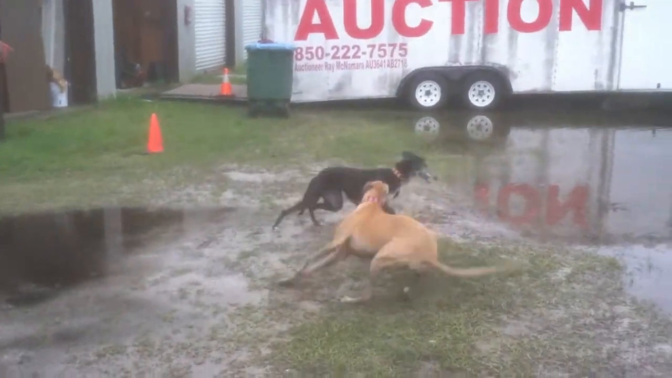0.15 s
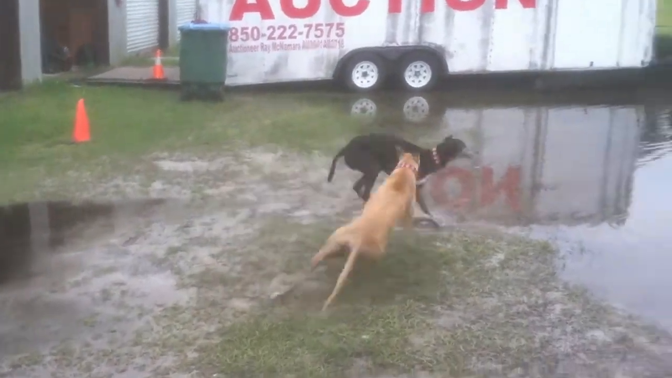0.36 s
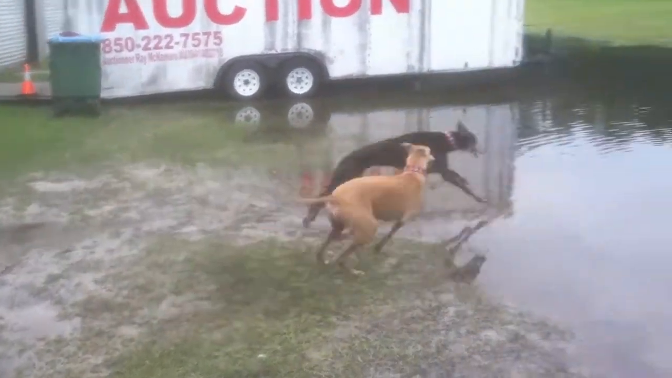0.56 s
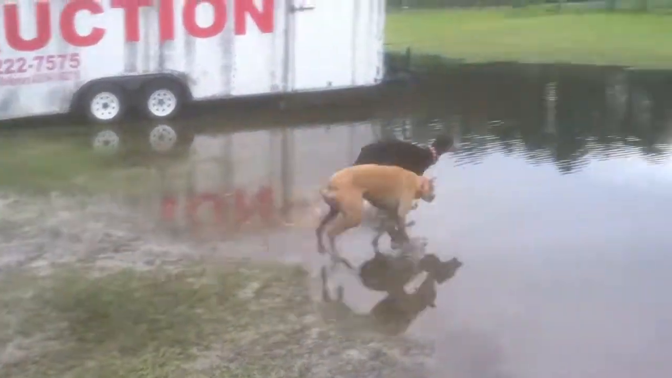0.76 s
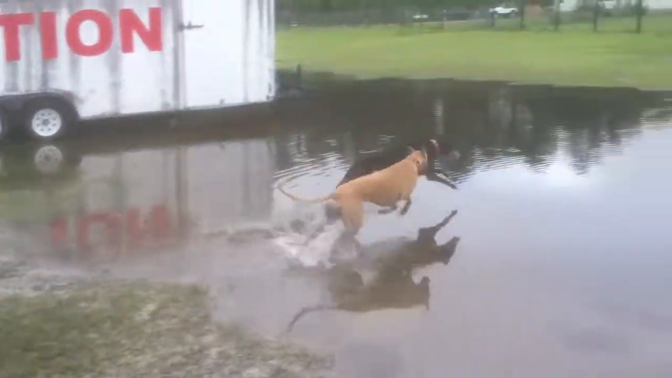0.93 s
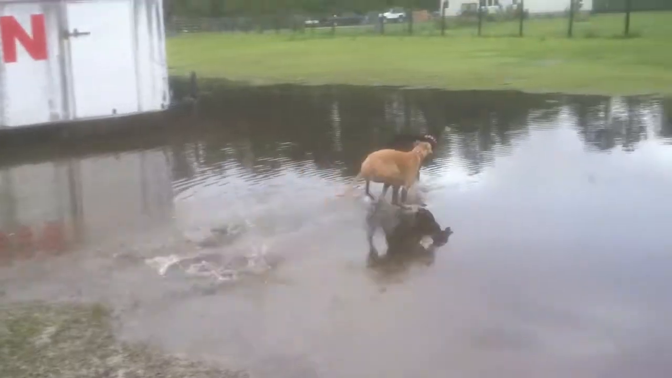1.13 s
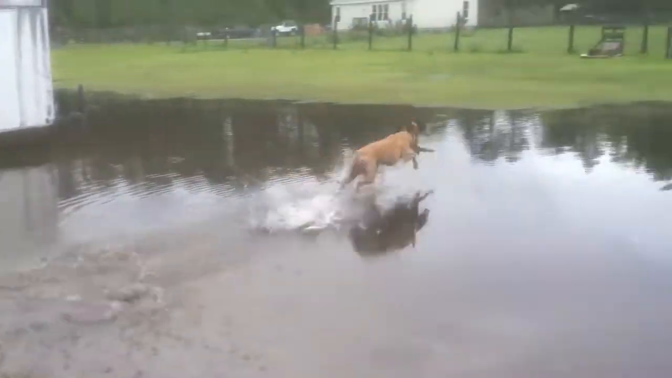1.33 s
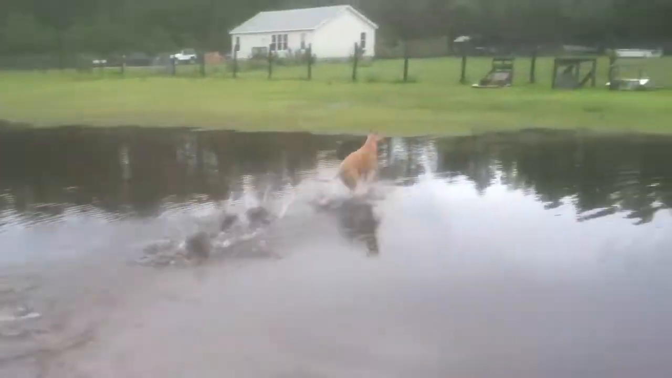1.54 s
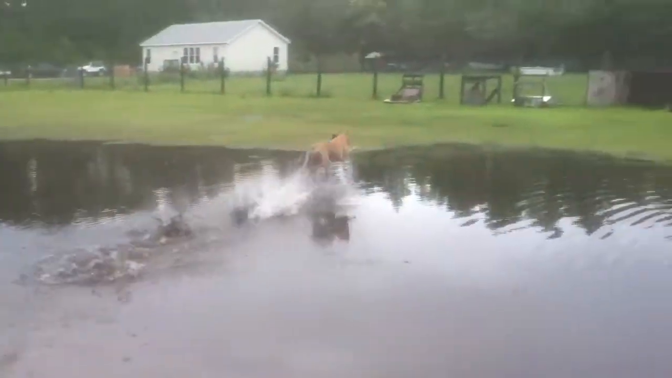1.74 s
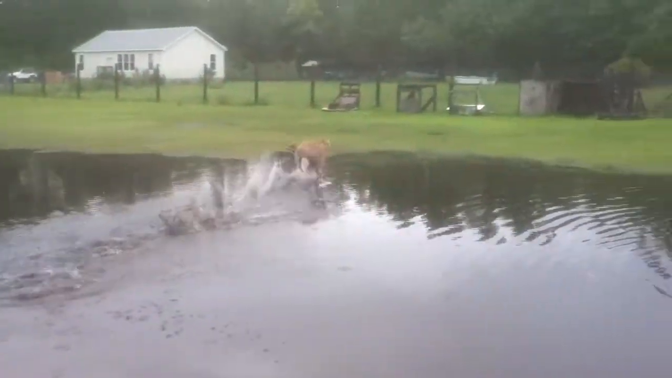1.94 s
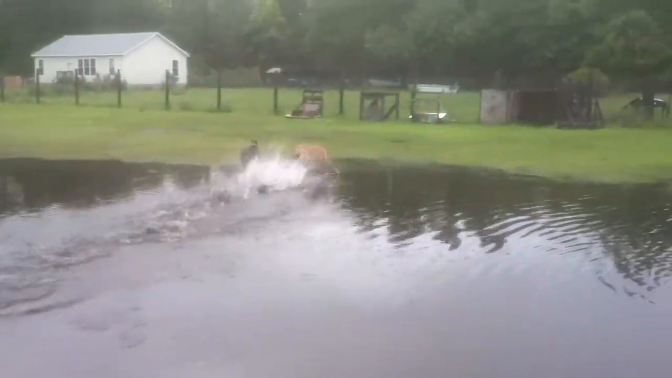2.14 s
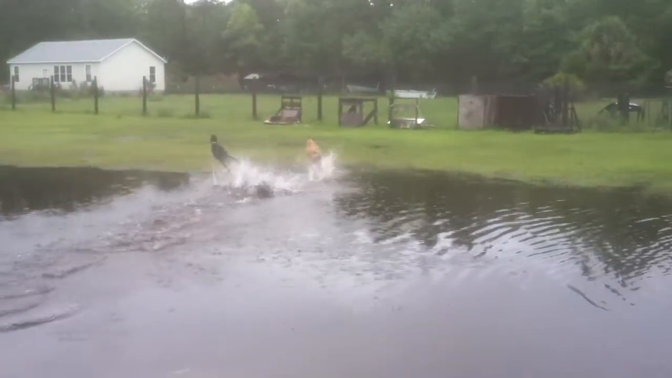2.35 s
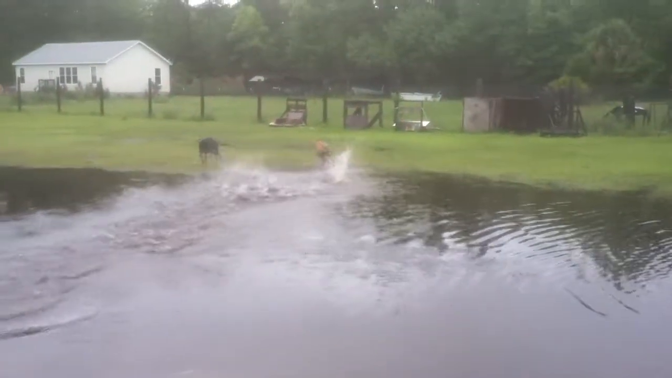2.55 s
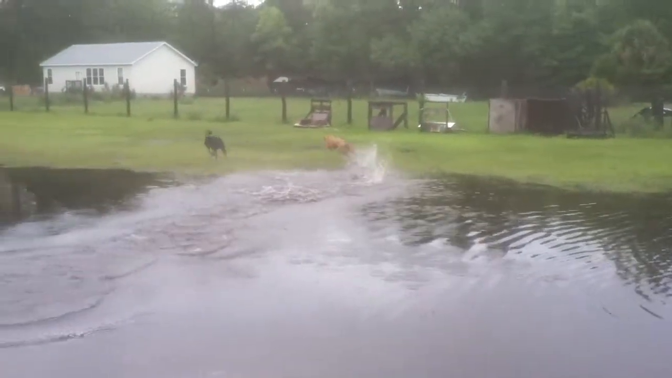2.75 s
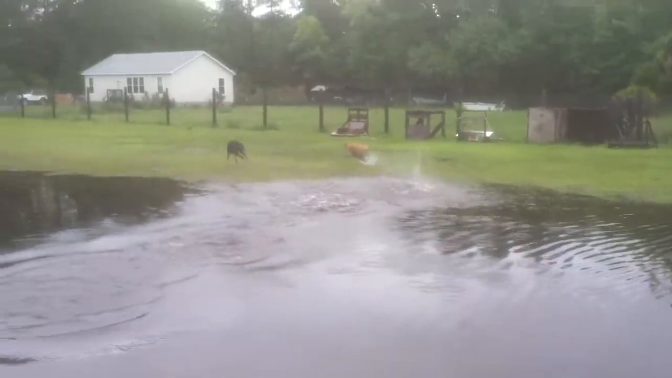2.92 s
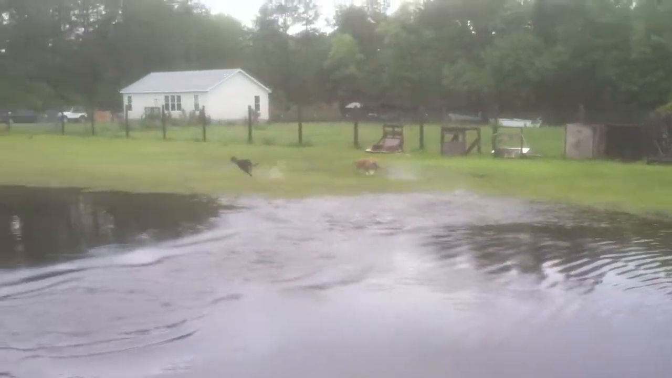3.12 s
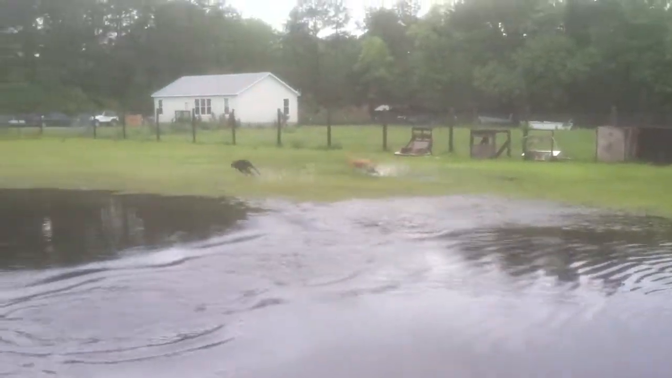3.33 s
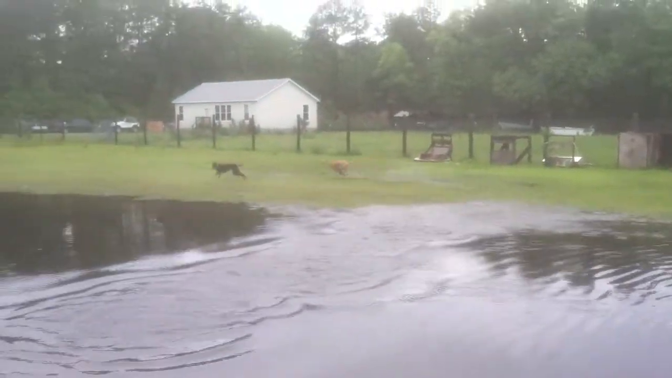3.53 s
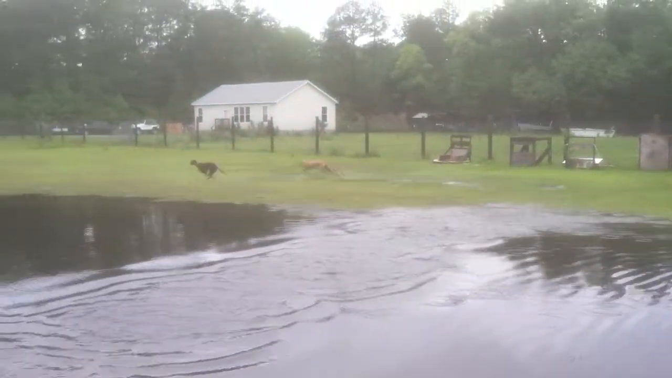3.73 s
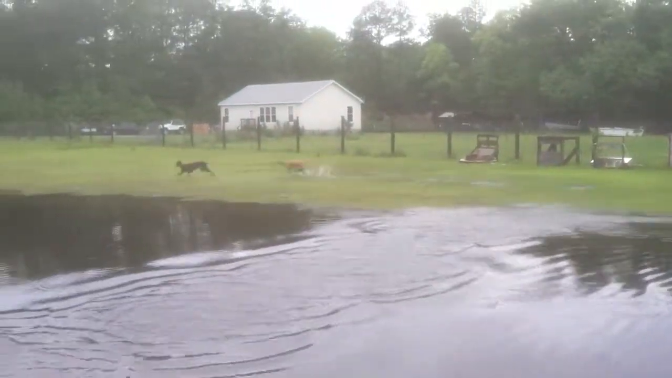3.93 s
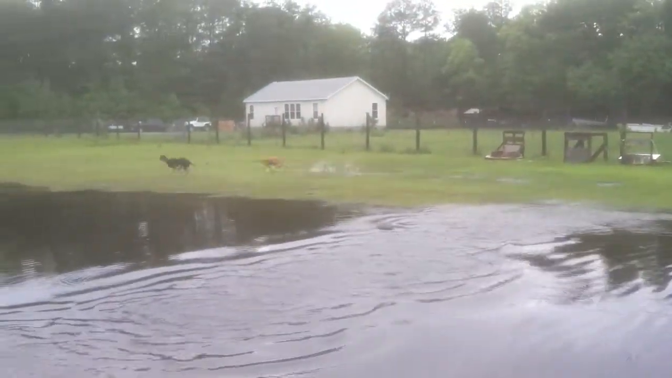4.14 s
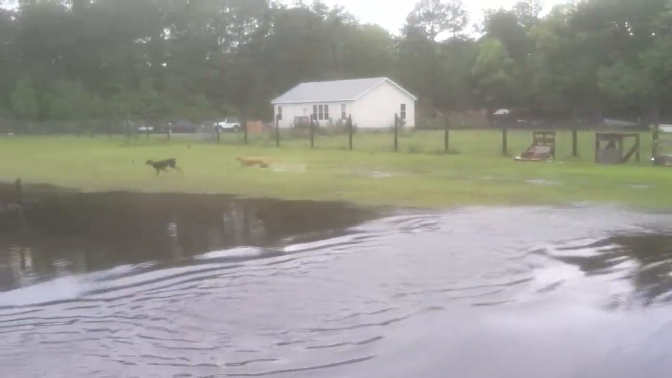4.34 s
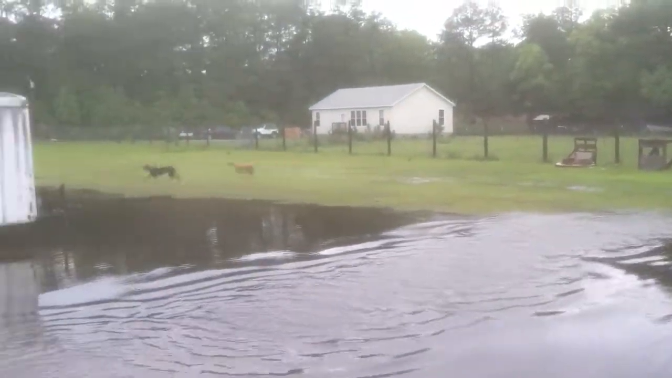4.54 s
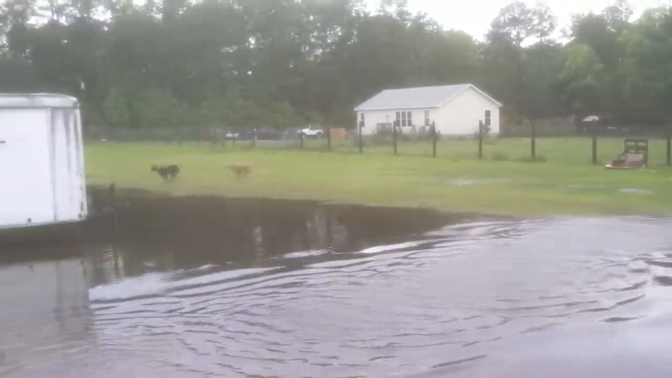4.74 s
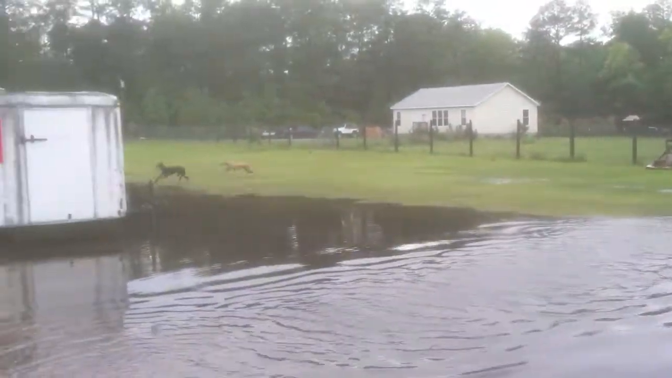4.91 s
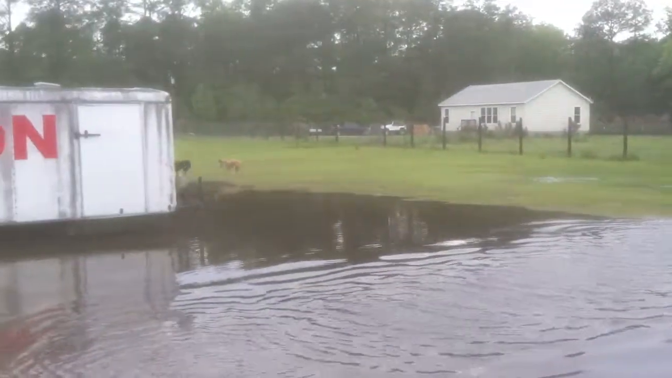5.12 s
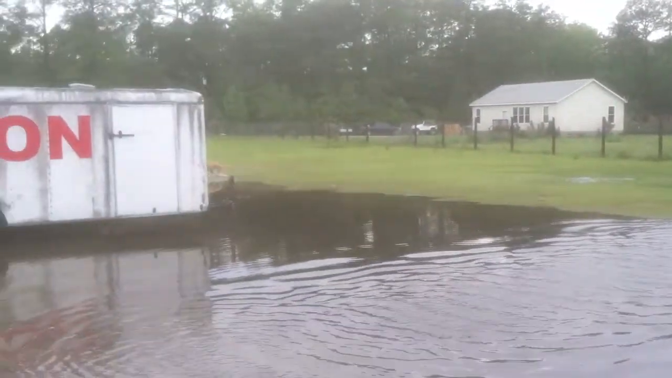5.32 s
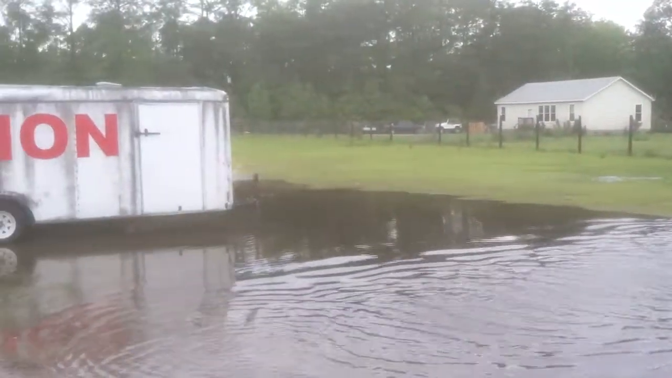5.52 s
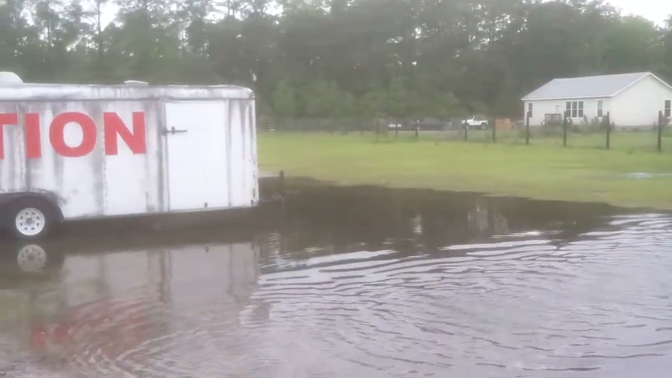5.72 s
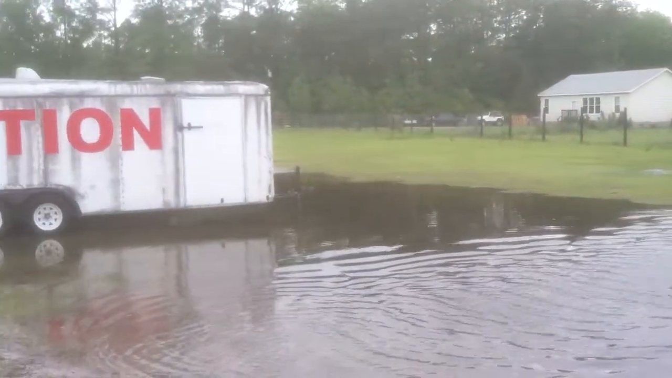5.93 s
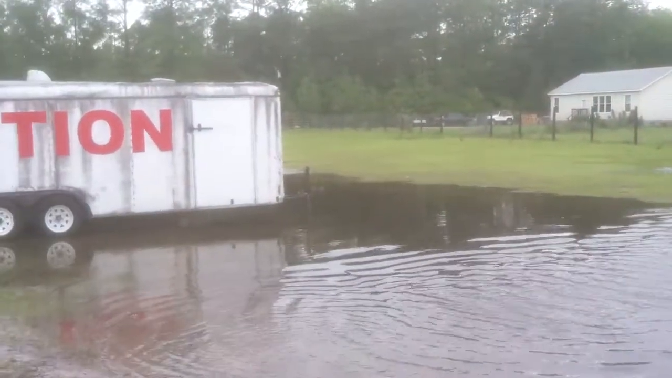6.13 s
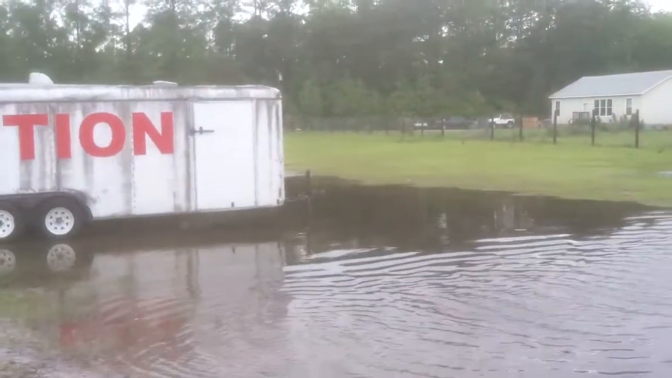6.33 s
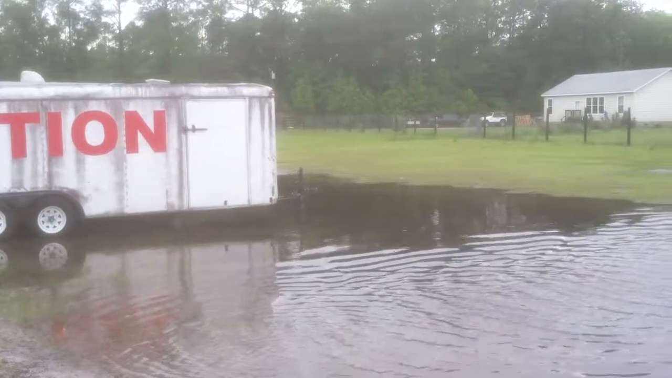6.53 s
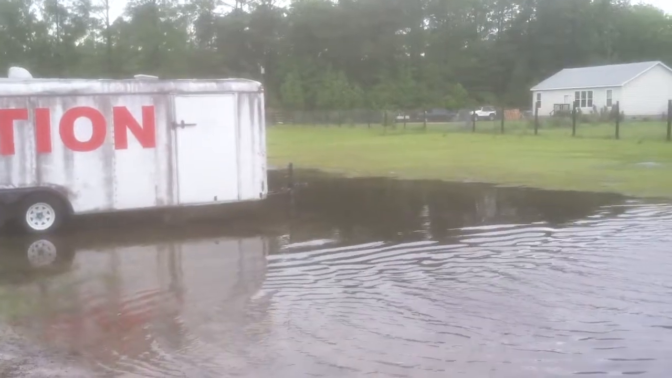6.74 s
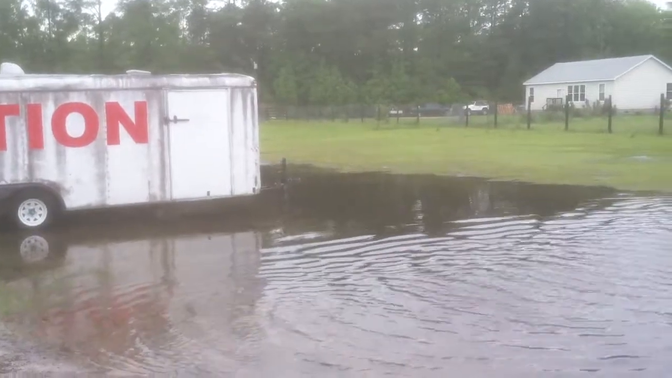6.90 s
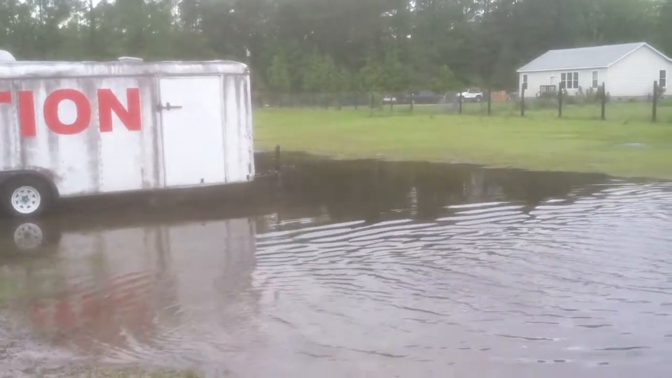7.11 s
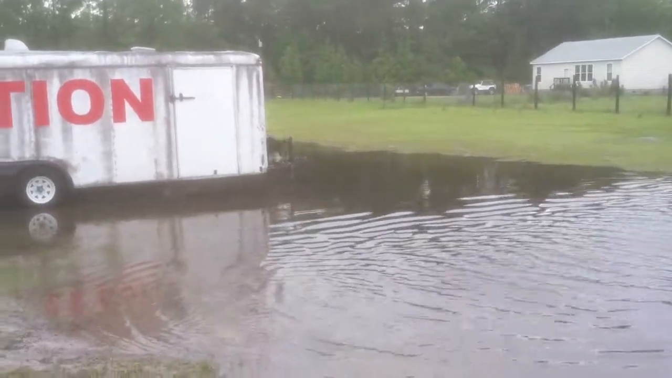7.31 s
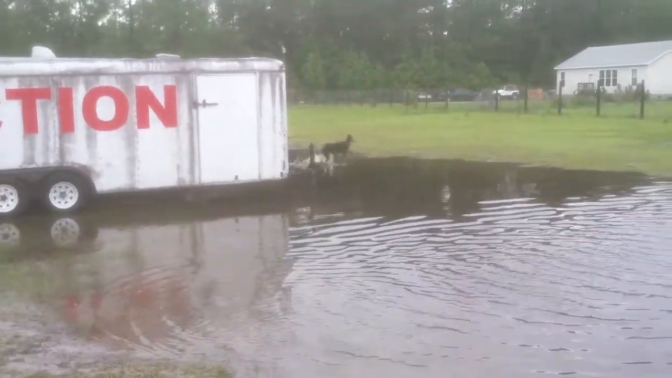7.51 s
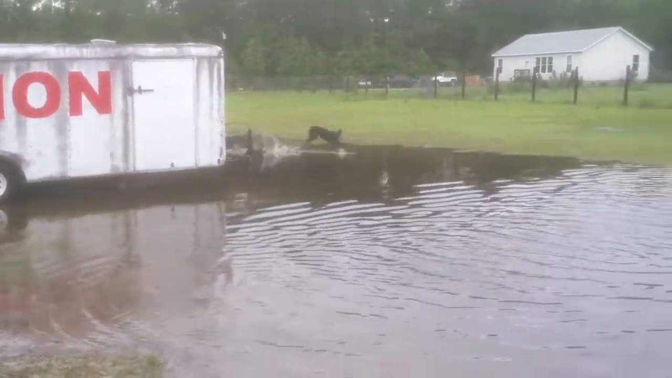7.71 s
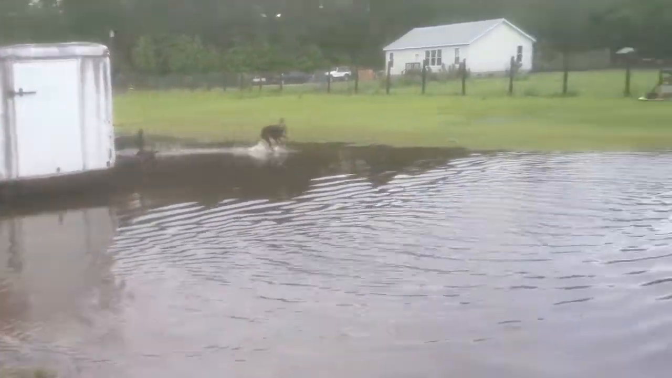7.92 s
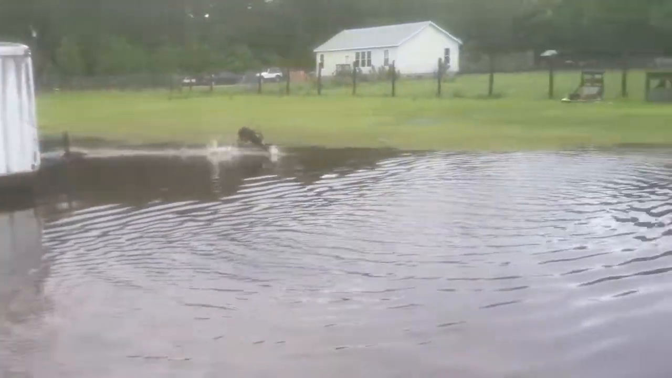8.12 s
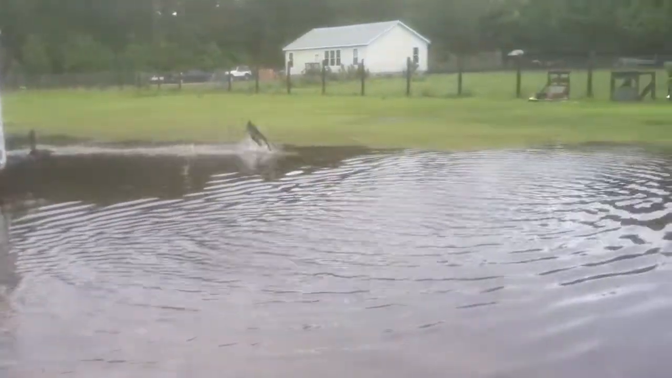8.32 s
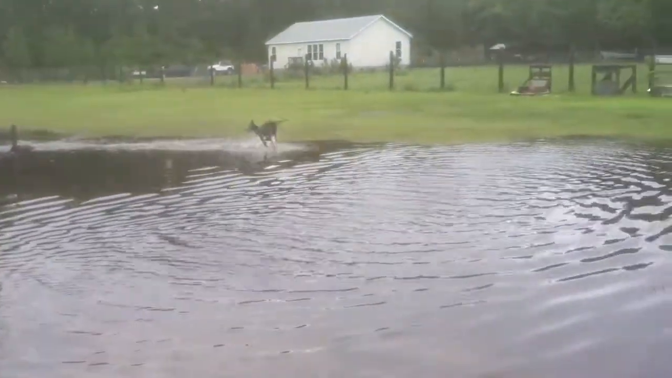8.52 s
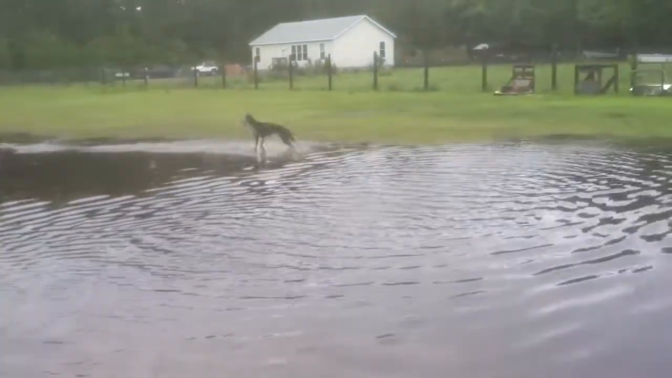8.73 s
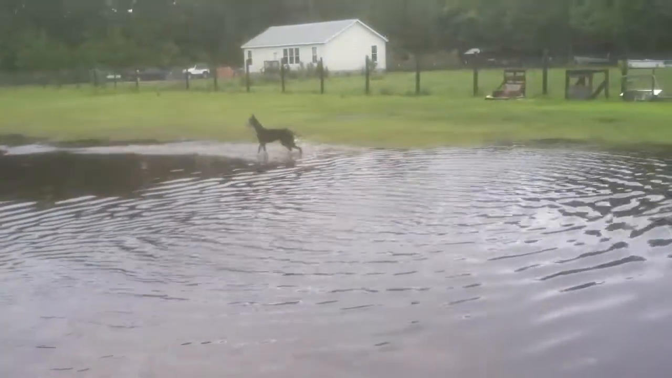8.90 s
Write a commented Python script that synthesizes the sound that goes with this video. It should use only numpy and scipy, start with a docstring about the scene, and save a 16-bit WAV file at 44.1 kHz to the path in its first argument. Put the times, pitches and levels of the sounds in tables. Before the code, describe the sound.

A handheld microphone in an open wet yard catches muddy scuffling and squelching, then rapid bubbly paw slaps and thrown water, loudest early and receding. Quiet follows, with soft air, a faint distant hum, lapping drops and a muffled patter of water around a trailer. After a thin bird whistle, crisp but distant splashes return and slow to loose trickling, with tiny tag clinks.

```python
"""Splashing paws: two dogs gallop through a wide shallow puddle after a scuffle on soaked turf; one splashes back.
Paw slaps are ringing air pockets with cracks and short drop bursts; gulps are low, decaying bubble tones.
Thrown water is bubbles and random impacts over a low rumble; levels follow a wake plus sheets and soft ticks.
Turf scuffs are bubbles with grit; squelches are noise through bending resonances; metal tags ring in modes.
A bird whistles faintly over filtered noise and a far hum; stray drips tick and weak echoes return."""
import sys
import numpy as np
from scipy import signal
from scipy.fft import rfft, irfft
from scipy.io import wavfile
from scipy.ndimage import uniform_filter1d

SR = 44100
rng = np.random.default_rng(int(sys.argv[2]) if len(sys.argv) > 2 else 0)


def store_pcm(level_fs):
    """Save levels as 16-bit WAV."""
    pcm = np.round(np.clip(level_fs, -1, 1) * 32767).astype(np.int16)
    wavfile.write(sys.argv[1], SR, np.atleast_2d(pcm).T)


N = 399555
TIME = np.arange(N) / SR


def amp(db):
    """Decibels to gain."""
    return 10 ** (np.asarray(db) / 20)


def evened(x):
    """Scales to an rms of one."""
    return x / np.sqrt(np.mean(x ** 2) + 1e-20)


def levelled(x, size=3500):
    """Holds the running rms near one over size samples; keeps the fine grain."""
    power = np.abs(uniform_filter1d(x ** 2, size))
    return x / np.sqrt(power + 1e-3 * np.mean(x ** 2))


def add(mix, s, sound):
    """Mixes a sound in at time s, cutting what falls outside."""
    start = round(s * SR)
    sound = sound[max(-start, 0):]
    part = mix[max(start, 0):][:len(sound) + min(start, 0)]
    part += sound[:len(part)]


def band(x, lo_hz, hi_hz, order=3):
    """Band-pass filter."""
    edges_hz = [lo_hz, min(hi_hz, SR / 2 - 1)]
    return signal.sosfilt(signal.butter(order, edges_hz, "band", fs=SR, output="sos"), x)


def colour(x, points, size=4096):
    """Minimum-phase filter of given spectrum and unit energy: clicks keep their sharp front."""
    hz, db = np.transpose(points)
    bin_hz = np.abs(np.fft.fftfreq(size, 1 / SR)) + 1
    log_gain = np.log(amp(np.interp(np.log(bin_hz), np.log(hz), db)))
    taps = np.fft.ifft(np.exp(np.conj(signal.hilbert(log_gain)))).real[:size // 2]
    return signal.oaconvolve(x, taps / np.linalg.norm(taps))[:len(x)]


def drift(rate_hz):
    """Smooth random curve of rms one; Gaussian roll-off at the given rate."""
    hz = np.fft.rfftfreq(N, 1 / SR)
    spectrum = rfft(rng.standard_normal(N)) * np.exp(-(hz / rate_hz) ** 2)
    return evened(irfft(spectrum, N))


def droplets(per_s, spread_db):
    """Tiny impacts at random moments, with random sign and size."""
    size = amp(spread_db * np.minimum(rng.exponential(1, N), 4))
    hits = rng.random(N) < per_s / SR
    return evened(size * rng.choice([-1, 1], N) * hits)


def ring(t, hz, cycles, rise):
    """A bubble: a sine that dies within some cycles and rises in pitch as it nears the surface."""
    age = t * hz / cycles
    return np.exp(-age) * np.sin(2 * np.pi * hz * t * (1 + rise * age))


def bubbles(lo_hz, hi_hz, cycles, spread_db, count, size):
    """A cloud of bubbles, each with its own moment, pitch, damping and strength."""
    when, pitch, damping, strength, sign = rng.random((count, 5)).T[:, :, None]
    hz = lo_hz * (hi_hz / lo_hz) ** pitch
    n = np.arange(size)
    gain = amp(-spread_db * np.log(strength + 0.056)) * np.sign(sign - .5) * hz
    own_cycles = cycles * 2 ** (2 * damping - 1)
    rings = gain * ring(n / SR, hz, own_cycles, rise=0.021) * (1 - n / size)
    places = (when * N).astype(int) + n
    return evened(np.bincount(places.ravel(), rings.ravel(), N + size)[:N])


def resonate(x, hz, width_hz):
    """A resonance that follows the curve hz: shift down to zero, smooth, shift back."""
    turn = np.exp(2j * np.pi * np.cumsum(hz) / SR)
    r = np.exp(-np.pi * width_hz / SR)
    return (turn * signal.lfilter([1 - r], [1, -r], x / turn)).real


# hollow squelches and gruff huffs of the wrestling:
# (time [s], length [s], start pitch [Hz], end pitch [Hz], level [dB])
SQUELCH_EVENTS = [(-.01, 0.045, 840, 740, -45), (0.09, 0.034, 1400, 1450, -44),
                  (0.11, 0.12, 296, 189, -46.5), (0.142, 0.2, 1410, 1510, -49.5),
                  (0.216, 0.056, 270, 196, -43.5), (0.22, 0.095, 1000, 1070, -46),
                  (0.383, 0.018, 1100, 1070, -40.5), (0.472, 0.067, 334, 403, -45),
                  (.565, 0.089, 1110, 1240, -44.5), (0.566, .06, 1390, 1540, -46.5),
                  (0.628, 0.11, 408, 323, -39.5), (0.641, 0.077, 1290, 1240, -38.5),
                  (0.765, 0.051, 1310, 950, -40.5), (0.889, 0.05, 736, 800, -43)]


def squelches():
    """Air and water squeeze through a hollow that changes size, so its pitch bends."""
    out = np.zeros(N)
    rushes = rng.standard_normal((len(SQUELCH_EVENTS), SR))
    for (s, length, start_hz, end_hz, db), rush in zip(SQUELCH_EVENTS, rushes):
        hz = np.linspace(start_hz, end_hz, int(length * SR))
        hollow = resonate(rush[:len(hz)], hz, width_hz=140)
        hollow = resonate(hollow, hz, width_hz=190)
        add(out, s, amp(db) * levelled(hollow, size=600) * signal.windows.tukey(len(hz), .5))
    return out


# paws skidding on soaked turf: (time [s], length [s], level [dB], grit setting [dB])
SCUFF_EVENTS = [(-.005, 0.022, -38, 10), (0.024, 0.14, -43, 4), (0.16, 0.031, -48, 8),
                (0.212, .11, -44, 6.5), (0.327, 0.053, -61, 12), (0.382, 0.044, -37.5, -15),
                (0.426, 0.026, -48, 12), (0.468, 0.046, -39, 6), (0.571, 0.16, -41.5, 5.5),
                (0.65, 0.073, -45, 10.5), (0.709, 0.064, -37.5, 12.5), (0.762, .014, -55, 16),
                (0.816, .08, -52, 12)]
# turf spectrum: (frequency [Hz], relative density [dB])
TURF_SPECTRUM = [(24, -58), (40, -29), (216, 1.5), (257, 2), (412, 2), (454, 3.5), (866, -1.5), (1290, -1),
                 (1780, -10), (2340, -8.5), (3470, -28), (4130, -23.5), (7490, -24.5), (10100, -35.5),
                 (15000, -58)]


def scuffs():
    """Paws drag through mud and grass: a dull squelch with wet grit on top."""
    squelch = bubbles(138, 2890, cycles=1.36, spread_db=0.5, count=7000, size=500)
    squelch = squelch + 2.0 * droplets(5000, spread_db=-4.5)
    squelch = levelled(colour(squelch, TURF_SPECTRUM), size=1500)
    grit = evened(band(colour(droplets(2500, spread_db=-1.5), TURF_SPECTRUM), 1660, 12000))
    out = np.zeros(N)
    for s, length, db, grit_db in SCUFF_EVENTS:
        corners_s = [s, s + 0.0089, s + 0.81 * length, s + length + 0.0085]
        stroke = np.interp(TIME, corners_s, [0.041, 0.71, 0.71, 0.00088])
        out += amp(db) * stroke * (squelch + amp(grit_db - 13.5) * grit)
    return out


# distant hum that swells and fades: (time [s], level [dB])
HUM_LEVEL = [(0, -95), (2.9, -65.5), (4.3, -64), (4.9, -77.5), (9.06, -78)]
# air spectrum: (frequency [Hz], relative density [dB])
AIR_SPECTRUM = [(15, -41), (25, -12), (49, -27.5), (116, -2), (209, -1), (421, -15.5), (781, -12.5),
                (894, -23), (1230, -18.5), (1800, -18), (2110, -10.5), (3430, -19.5), (7680, -26.5),
                (14300, -42.5), (15500, -51)]
HUM_HZ, AIR_DB = 207.7, -63.5  # both centres of slight drift


def outdoors():
    """Soft filtered-noise air with a low, slightly unsteady hum."""
    noise = evened(colour(rng.standard_normal(N), AIR_SPECTRUM))
    air = noise * amp(AIR_DB + drift(7.5))
    phase = 2 * np.pi * np.cumsum(HUM_HZ + drift(6)) / SR
    hum = evened(np.sin(phase) * (1 + .1 * drift(6)))
    return air + hum * amp(np.interp(TIME, *np.transpose(HUM_LEVEL)))


# splash spectrum, also for slaps and thrown water: (frequency [Hz], relative density [dB])
SPLASH_SPECTRUM = [(60, -35), (130, -15.5), (225, -4.5), (340, -15), (490, -2.5), (700, 1.5), (870, -8),
                   (1220, 3), (1620, -7), (1830, -13.5), (2280, -3.5), (3700, -29), (6700, -19),
                   (12500, -49)]


def drips():
    """Stray drops and lapping ripples: sparse filtered ticks throughout."""
    ticks = colour(droplets(60, spread_db=2), SPLASH_SPECTRUM)
    return amp(-74) * evened(band(ticks, 1900, 8000, order=2))


def yard(x):
    """Weak scattered echoes from a trailer, a shed and the trees: sparse decaying random taps."""
    t = np.arange(SR // 2) / SR
    sparse = (rng.random(len(t)) < .05) * (t > .012)
    taps = rng.standard_normal(len(t)) * sparse * amp(-60 * t / 0.88)
    return signal.oaconvolve(x, taps / np.linalg.norm(taps))[:N]


# tags knocking together:
# (time [s], level setting [dB], pitch the blow favours [Hz], ring time [share of free ring])
CLINK_EVENTS = [(0.1145, -27, 9900, 0.3), (0.1392, -34, 7220, .15), (0.192, -36.5, 7140, .15),
                (0.2814, -37, 7240, 0.17), (0.306, -40.5, 7600, .6), (1.2168, -20.5, 9500, 0.76),
                (1.261, -35, 6070, 1.3), (4.768, -45.5, 7500, 1.4), (4.857, -40, 9930, 1.8),
                (4.974, -46, 9800, 0.54), (5.2157, -34.5, 9900, 1.1), (5.244, -48, 7050, 0.7),
                (6.07, -60, 10000, 1), (6.679, -43, 7900, .6), (8.553, -44, 10000, .8),
                (8.59, -37, 9700, 0.42), (8.742, -37, 9800, 0.65), (8.762, -44, 9960, .8),
                (8.7883, -42.5, 9900, .8)]
# free modes of the tags: (frequency [Hz], level [dB], t60 [s])
TAG_MODES = [(6070, -3.5, .3), (7590, -3, .1), (9800, 0, .025), (10030, 0, .04)]
SWING_HZ = 17  # a dangling tag turns, so its ring throbs


def tags():
    """Small metal plates ring; where they are struck decides which mode leads, and fur may damp them."""
    t, out = np.arange(SR // 4) / SR, np.zeros(N)
    hz, mode_db, t60 = np.transpose(TAG_MODES)[:, :, None]
    turns = rng.random((len(CLINK_EVENTS), len(TAG_MODES), 1))
    throb = 1 - .6 * np.sin(np.pi * SWING_HZ * t) ** 2
    attack = 1 - np.exp(-t / 0.00031)
    for (s, db, lead_hz, free), turn in zip(CLINK_EVENTS, turns):
        weight = amp(mode_db - np.minimum(55 * np.abs(np.log(hz / lead_hz)), 13))
        decay = np.exp(-np.log(1000) * t / (t60 * max(free, .1)))
        modes = weight * decay * np.sin(2 * np.pi * (hz * t + turn)) * throb
        tick = 1.3 * band(rng.standard_normal(len(t)), 0.69 * lead_hz, 1.0 * lead_hz)
        tick = tick * np.exp(-t / 0.0049)
        clink = modes.sum(0) / np.linalg.norm(weight) + tick
        add(out, s + 0.00076, amp(db - 6.5) * clink * attack)
    return out


# thuds of paws and large air pockets closing:
# (time [s], level setting [dB], pitch [Hz], decay [cycles])
GULP_EVENTS = [(0.121, -28, 200, 0.66), (0.2, -34, 230, 1.4), (0.224, -27.5, 190, 1.3),
               (0.591, -30, 213, 5.5), (.66, -37, 388, 4.8), (.692, -30, 342, 2.7), (0.727, -30, 334, 4.6),
               (0.778, -34, 196, 3.3), (0.864, -25.5, 487, 1.6), (0.984, -24, 503, 2.2),
               (1.506, -32, 232, 2.7), (1.594, -39, 306, 1.4), (1.665, -24.5, 231, 3.2),
               (1.686, -26, 210, 2), (2.447, -42, 196, 1.4), (2.75, -39, 333, 1.3),
               (2.786, -33.5, 255, 0.77), (3.328, -34.5, 141, 0.73), (4.374, -28, 517, 1.6),
               (5.775, -37, 452, 3.5), (6.136, -41, 477, 2.7), (6.203, -40, 384, 1.8), (7.3, -42, 300, 1.9),
               (8.106, -39, 291, 3.4), (8.125, -41, 292, 2.2), (8.446, -31.5, 513, 2.3),
               (8.449, -37, 264, 0.74)]


def gulps():
    """Paws thud on the ground under the water; deep hollows behind the legs close with a low plop."""
    t, out = np.arange(SR // 6) / SR, np.zeros(N)
    for s, db, hz, cycles in GULP_EVENTS:
        swell = 1 - np.exp(-t * hz / (0.29 * cycles))
        add(out, s, amp(db - 2.5) * ring(t, hz, cycles, rise=0.0057) * swell)
    return band(out, 74, 3000, order=2)


# paws and heavy drops striking water:
# (time [s], level setting [dB], pocket pitch [Hz], decay [cycles], relative spray setting [dB])
SLAP_EVENTS = [(0.3928, -37.5, 1110, 4.3, -18.5), (0.985, -29, 1300, 1.9, -13),
               (1.009, -26.5, 646, 1.2, -24), (1.014, -32, 1000, 1.6, -15), (1.0417, -23, 1330, 3.7, -32),
               (1.0445, -26.5, 990, 1.9, -15.5), (1.188, -27, 1260, 2.3, -24),
               (1.2434, -21.5, 1010, 0.6, -22.5), (1.3309, -24.5, 1980, 4.7, -24),
               (1.4175, -18.5, 1237, 1.1, -42), (1.425, -27, 1250, 3.6, -36), (1.484, -29, 1240, 4, -28),
               (1.557, -20, 610, 1.1, -23), (1.5717, -30, 1690, 4, -35), (1.5905, -20.5, 574, 1.2, -21),
               (1.6225, -25, 790, 2.7, -18.5), (1.6487, -21.5, 1190, 2, -21), (1.694, -36, 2400, 1.3, -8),
               (2.016, -25.5, 700, 2, -18.5), (2.033, -31, 1210, 4.4, -23), (2.1224, -32, 600, 3.5, -9.5),
               (2.147, -28, 530, 2.7, -37), (2.3195, -30.5, 660, 2.4, -17.5), (2.378, -26, 1290, 2.1, -30),
               (2.608, -37.5, 1150, 2.5, -28), (2.697, -37, 1180, 5, -32), (2.752, -26.5, 740, 0.74, -24.5),
               (2.788, -38, 695, 2, -21), (2.846, -35, 1260, 3, -24), (3.064, -42, 3050, 5.6, -14),
               (3.091, -38.5, 2580, 3.2, -22), (3.102, -40.5, 1200, 4.8, -19),
               (3.348, -37.5, 1350, 3, -19.5), (3.372, -35, 1160, 0.89, -23), (3.4045, -39, 1140, 3.6, -33),
               (3.418, -31.5, 1530, 2.1, -26), (3.431, -33, 1170, 1.7, -32), (3.495, -43.5, 1090, 4, -14),
               (3.589, -40.5, 1270, 1.9, -39), (3.761, -46.5, 2410, 3, -22),
               (3.9846, -32.5, 2220, 1.3, -28), (4.019, -35, 1500, 0.47, -31),
               (4.1004, -42.5, 1200, 2.5, -30), (4.1018, -38, 2320, 2.2, -20.5),
               (4.176, -44, 2850, 3.1, -15), (4.3094, -45, 2240, 5.3, -22), (4.3757, -31, 1310, 2.6, -26),
               (4.38, -36.5, 2280, 2.5, -35), (4.39, -40.5, 563, 1.3, -23), (4.475, -46, 1130, 4.3, -16),
               (4.716, -50, 1120, 3.5, -11), (5.201, -50, 2350, 3.5, -29), (5.351, -43, 2350, 5.7, -20),
               (5.381, -45, 2000, 2, -14), (5.466, -43, 2200, 2.4, -22), (5.528, -41, 2320, 4.5, -16),
               (5.532, -41, 1330, 2.4, -23), (5.577, -40, 1700, 1.3, -25), (5.6857, -43, 2220, 5.8, -19),
               (5.798, -38.5, 2330, 2.5, -25), (6.85, -52, 2300, 4, -17), (7.571, -47, 1110, 4, -26),
               (7.6309, -44, 464, 1.9, -26), (7.715, -37.5, 1160, 3, -12.5), (7.765, -44, 2390, 6, -17),
               (7.785, -28.5, 1270, 2.5, -36), (7.869, -41, 2270, 5, -26), (7.8946, -43, 1160, 6.6, -19),
               (7.931, -39, 1190, 6.9, -15.5), (7.939, -40, 720, 2.3, -29),
               (8.0324, -42.5, 2190, 4.4, -12.5), (8.041, -43, 653, 2.6, -18), (8.07, -47, 1230, 7, -20),
               (8.18, -32.5, 1070, 1.4, -25), (8.226, -36.5, 2170, 4, -22), (8.278, -39.5, 1530, 2.8, -19),
               (8.4458, -32, 942, 0.57, -22), (8.484, -35, 2030, 1.5, -17.5), (8.504, -44, 1090, 1.8, -29),
               (8.538, -44, 1210, 3.3, -24), (8.649, -35, 2260, 2.7, -18.5), (8.662, -35.5, 1210, 2.7, -23),
               (8.875, -40.5, 1530, 3, -28), (8.913, -39.5, 1390, 3.5, -21), (8.982, -43.5, 1420, 6, -24)]
# spray spectrum, also for thrown water: (frequency [Hz], relative density [dB])
SPRAY_SPECTRUM = [(3000, 6), (3900, -2.5), (4900, 0), (5350, 1), (5850, -1.5), (6750, 3.5), (8200, -5),
                  (9900, -8.5), (11500, -17), (15000, -27)]


def slaps():
    """Each paw squeezes an air pocket that pops and rings, cracks the surface and throws a burst of drops."""
    t = np.arange(-SR // 100, SR // 10) / SR
    pockets, cracks, bursts = np.zeros((3, N))
    for s, db, hz, cycles, spray_db in SLAP_EVENTS:
        age = t * hz / max(cycles, .5)
        # builds up faster than it dies away
        swell = np.exp(np.minimum(3 * age, -age))
        tone = np.cos(2 * np.pi * hz * t * (1 + .015 * age))
        add(pockets, s + t[0], amp(db + .5) * swell * tone)
        add(cracks, s, amp(db + 2) * np.ones(1))
        burst_shape = np.exp(np.minimum(t / .001, -t / .008))
        add(bursts, s + t[0], amp(db + spray_db + 6) * burst_shape)
    drops = evened(band(colour(droplets(4000, spread_db=2.5), SPRAY_SPECTRUM), 2000, 11000))
    return band(pockets + colour(cracks, SPLASH_SPECTRUM), 190, 20000, order=2) + bursts * drops


# stirred water falling back across the puddle, round the field and on the return:
# (time [s], level setting [dB], relative fine spray [dB], relative low water and ambient rumble [dB])
WAKE_LEVELS = [(.8, -45, -6.5, -7), (1.11, -43.5, -7, -1.5), (1.22, -38, -9.5, -6), (1.89, -38, -11.5, -7),
               (2.197, -37.5, -11, -8.5), (2.76, -43.5, -8.5, -12.5), (2.91, -49, -7.5, -27),
               (3.27, -54, -5.5, -5.5), (3.918, -61.5, -2, -2.5), (4.42, -57.5, -6.5, -9.5),
               (4.8, -65.5, -7, 3), (5.3, -64.5, -0.5, -1), (5.88, -54.5, -7, -7.5),
               (6.15, -56.5, -5.5, -1.5), (6.8, -67.5, -5, -2), (7.39, -66, -3, 0.5),
               (7.65, -55.5, -5.5, -10), (8.3, -52, -8.5, -13), (8.81, -54.5, -3.5, -12),
               (9.06, -51.5, -8, -29)]
# sheets of thrown water from strides, and a few soft ticks:
# (time [s], length [s], level setting [dB], relative fine spray [dB])
BURST_EVENTS = [(0.878, 0.02, -39.5, -16), (1.013, 0.03, -39, -3.5), (1.146, 0.031, -39, -14),
                (1.285, 0.11, -39.5, -5), (1.642, 0.067, -37.5, -5.5), (1.97, 0.11, -50, 0),
                (2.095, 0.068, -41.5, -8.5), (3.032, 0.12, -56, 0.5), (3.181, 0.02, -49, -16),
                (3.286, 0.034, -60.5, 5), (3.412, 0.073, -52, -5.5), (3.761, 0.015, -58, -2),
                (3.811, 0.021, -53, -2.5), (4.01, 0.176, -56.5, -21), (4.303, 0.012, -50.5, -12),
                (4.364, 0.13, -56, -10), (4.681, 0.0055, -65, 6.5), (4.834, 0.005, -64, 2),
                (5.039, 0.006, -68, 11), (5.344, 0.028, -52.5, -6), (5.442, 0.02, -59, 1),
                (5.514, 0.072, -57.5, -2), (7.177, 0.025, -69, 3.5), (7.425, 0.023, -55.5, -6),
                (7.475, 0.027, -51.5, -4), (7.557, 0.021, -52, -10), (7.616, 0.036, -52, -15),
                (7.645, .01, -54, -1), (7.796, 0.011, -56, -4), (7.84, 0.019, -60.5, 5),
                (7.915, 0.019, -51, -2), (7.962, 0.021, -54.5, -2.5), (8.026, 0.013, -49, -14),
                (8.065, 0.014, -58, -4), (8.094, 0.018, -52, -2.5), (8.158, 0.063, -52.5, -6),
                (8.264, 0.025, -53.5, 0), (8.405, .02, -54.5, -1), (8.436, 0.011, -46, -5),
                (8.497, 0.01, -47.5, -7), (8.551, 0.019, -51, -4), (8.866, .014, -62, 7),
                (9.025, 0.03, -52.5, -16)]
THROW_S, SETTLE_S = 0.004, 0.023  # burst rise; amplitude time constant after its length
BURST_LOW_DB = -7  # low layer relative to the burst


def water_levels():
    """Levels [dB] of bubbles, spray and low rumble: wake plus sheets and soft ticks, summed as power."""
    s, *columns = np.transpose(WAKE_LEVELS)
    wake_db, spray_db, low_db = (np.interp(TIME, s, c) for c in columns)
    power = amp([wake_db, wake_db + spray_db, wake_db + low_db]) ** 2
    t = np.arange(SR // 2) / SR
    for start, length, db, fine_db in BURST_EVENTS:
        burst = np.minimum(t / THROW_S, 1) * np.exp(-np.maximum(t - length, 0) / SETTLE_S)
        for layer, share_db in zip(power, (0, fine_db, BURST_LOW_DB)):
            add(layer, start, (amp(db + share_db) * burst) ** 2)
    return 10 * np.log10(power)


CLUMPS_PER_S, CLUMP_S = 55, .016  # mean rate; time constant of the heap before its square root


def clumps():
    """Dollops that land abruptly and drain away: a random saw-tooth of rms one around zero."""
    landings = rng.random(N) < CLUMPS_PER_S / SR
    heap = np.sqrt(signal.lfilter([1], [1, -np.exp(-1 / (CLUMP_S * SR))], landings))
    return evened(heap - heap.mean())


# splashing that comes round a trailer; end values held: (time [s], power share [0-1])
HIDDEN_SHARE = [(5.1, 0.8), (5.35, 0.46), (5.7, 1), (7.3, 0.98), (7.55, 0.2)]
# spectrum round the trailer: (frequency [Hz], relative density [dB])
BEHIND_SPECTRUM = [(180, -17.5), (300, -6), (416, -11), (459, -4), (541, -3), (647, 2), (1020, -0.5),
                   (1230, 4.5), (1820, -3.5), (2360, -0.5), (3330, -20.5), (7920, -3), (8740, -2),
                   (15000, -57)]
CLUMP_DB = 1.8  # rms level swing in the open; less when hidden, half for spray
FAT_DROPS_DB = -10  # relative to the rush of falling water


def thrown_water():
    """Water falls back in clumps of bubbles and spray over a low rumble; a big splash adds a dense rush."""
    level_db, spray_db, low_db = water_levels()
    entry = np.interp(TIME, [.6, .83], [0, 1])
    hidden = np.clip(np.interp(TIME, *np.transpose(HIDDEN_SHARE)), 0, 1)
    clump_db = CLUMP_DB * clumps()
    froth = bubbles(377, 3150, cycles=5.5, spread_db=-3.5, count=9000, size=400)
    plinks = bubbles(644, 2986, cycles=21.0, spread_db=-3.0, count=900, size=1000)
    dense = np.interp(level_db, [-52, -38], [0, 1])
    rush = dense * bubbles(480, 1500, cycles=3.5, spread_db=1, count=4000, size=400)
    body = froth + .6 * plinks + .7 * droplets(1500, spread_db=3.2) + rush
    body = levelled(band(colour(body, SPLASH_SPECTRUM), 412, 3000))
    # fat drops
    crackle = colour(droplets(130, spread_db=2.5), SPLASH_SPECTRUM)
    crackle = evened(band(crackle, 550, 2800, order=2))
    body = body + amp(FAT_DROPS_DB) * crackle
    # smooth, scattered wash from round the trailer
    wash = evened(band(colour(droplets(6000, spread_db=2.5), BEHIND_SPECTRUM), 277, 4600))
    body = np.sqrt(1 - hidden) * body + np.sqrt(hidden) * wash
    fine_bubbles = bubbles(2825, 12440, cycles=12, spread_db=4.0, count=7000, size=240)
    mist = droplets(4000, spread_db=-1.5) + 0.61 * fine_bubbles
    spray = levelled(band(colour(mist, SPRAY_SPECTRUM), 2100, 12500))
    # low water and ambient rumble
    rumble = levelled(band(colour(droplets(700, spread_db=0.5), SPLASH_SPECTRUM), 90, 421))
    falling = amp(clump_db * (1 - .5 * hidden) + level_db - 1.7) * body
    falling = falling + amp(.5 * clump_db + spray_db - 2.5) * spray
    return entry * (falling + amp(low_db - 4.5) * rumble)


# far bird: (time [s], length [s], start pitch [Hz], end pitch [Hz], level setting [dB], blur [0-1])
CHIRP_EVENTS = [(5.05, .12, 3250, 3650, -74, .7), (6.97, .21, 3300, 3580, -72.5, .7),
                (7.428, .062, 2480, 2860, -56.5, .2)]


def bird():
    """Thin rising whistles, blurred by their way through the trees: sines mixed with resonant noise."""
    out = np.zeros(N)
    scatters = rng.standard_normal((len(CHIRP_EVENTS), SR))
    for (s, length, start_hz, end_hz, db, blur), scatter in zip(CHIRP_EVENTS, scatters):
        hz = np.linspace(start_hz, end_hz, int(length * SR))
        direct = evened(np.sin(2 * np.pi * np.cumsum(hz) / SR))
        scattered = resonate(scatter[:len(hz)], hz, width_hz=150)
        scattered = evened(resonate(scattered, hz, width_hz=150))
        whistle = evened((1 - blur) * direct + blur * scattered)
        add(out, s, amp(db) * np.hanning(len(hz)) * whistle)
    return out


def scene():
    """All sources in the open field; air, hum, drips and bird get no echoes."""
    dogs = squelches() + scuffs() + tags() + gulps() + slaps() + thrown_water()
    echoes = amp(-19) * yard(dogs)
    return (dogs + echoes + outdoors() + drips() + bird())[None]


EDGE_HZ = 15400


def record(dry):
    """The microphone loses the deepest bass; a steep low-pass then sets the band limit."""
    thin = signal.sosfilt(signal.butter(1, 35, "high", fs=SR, output="sos"), dry)
    taps = signal.firwin(511, EDGE_HZ, window=("kaiser", 9), fs=SR)
    return signal.oaconvolve(thin, taps[None], "same")


dry = scene()
out = record(dry)
store_pcm(out)
```